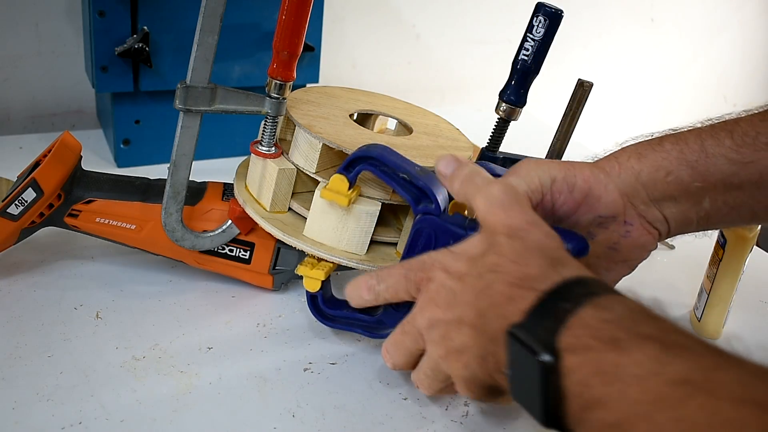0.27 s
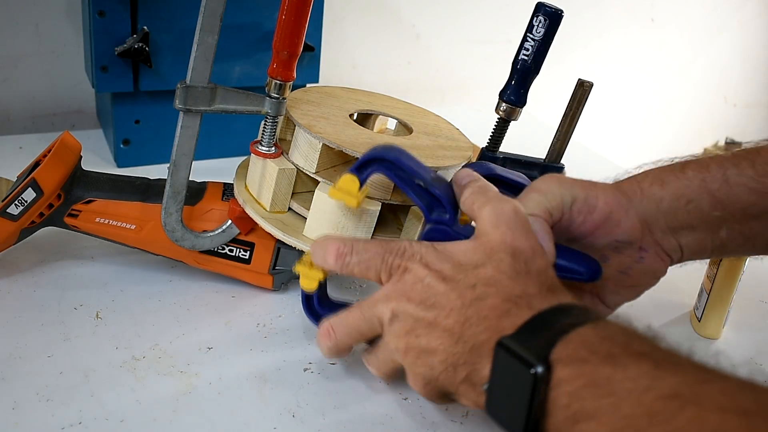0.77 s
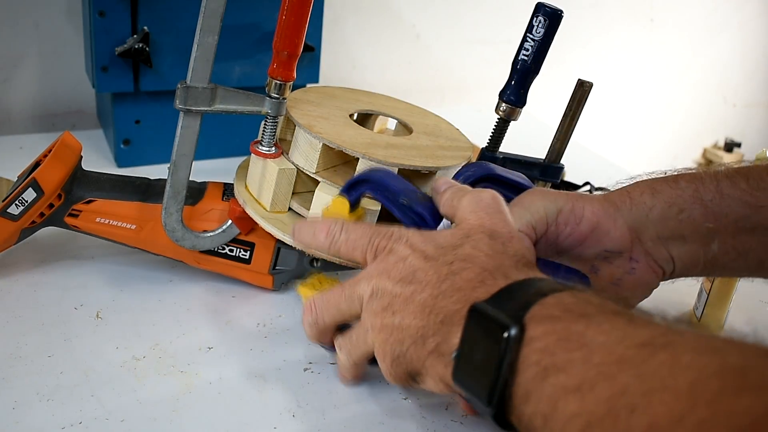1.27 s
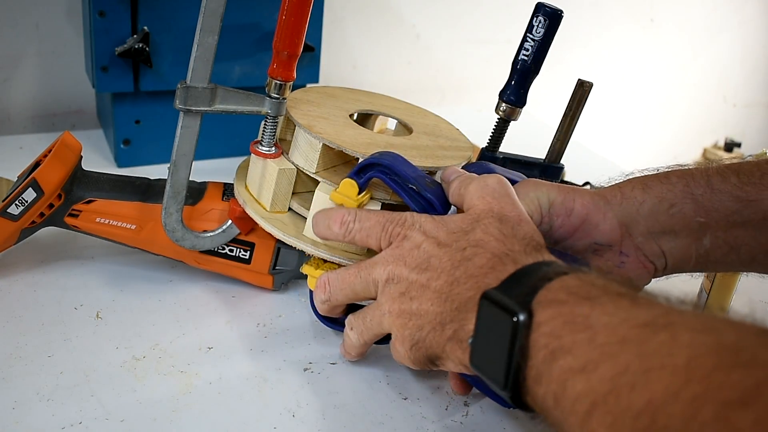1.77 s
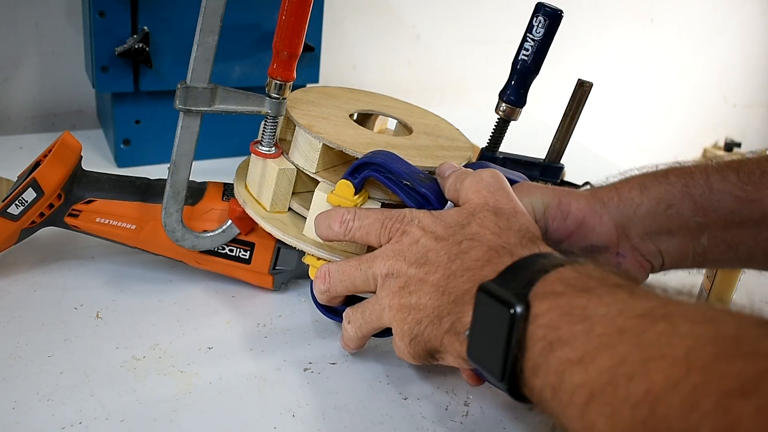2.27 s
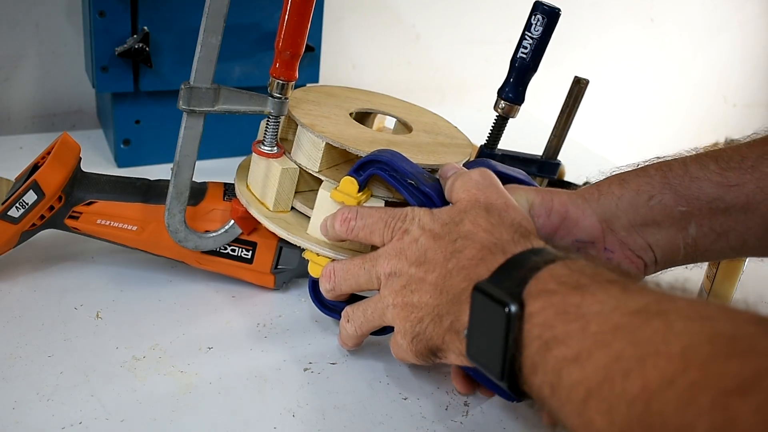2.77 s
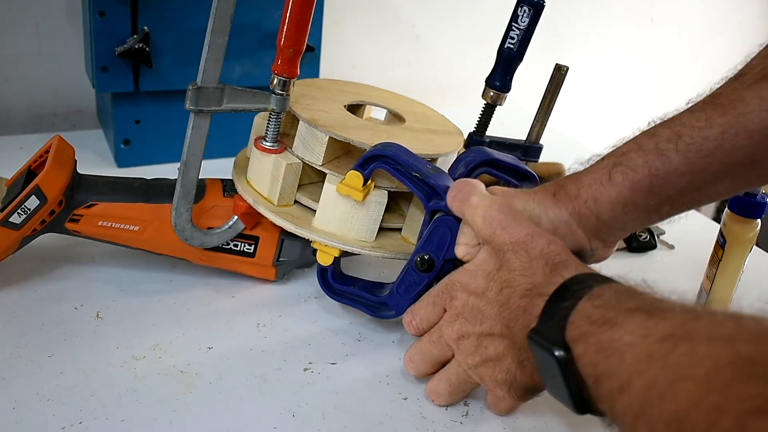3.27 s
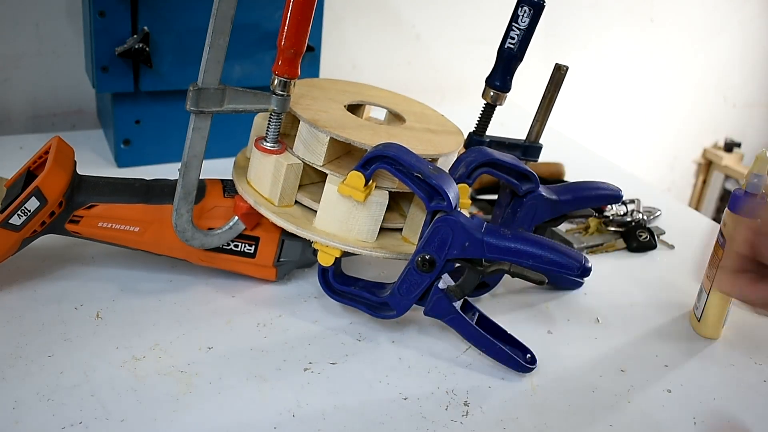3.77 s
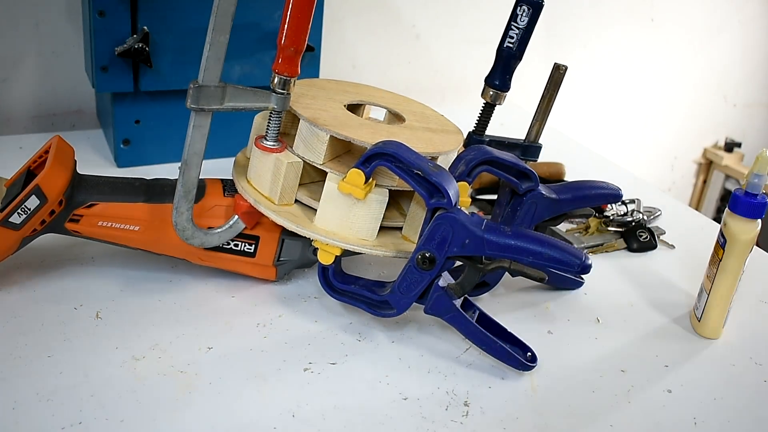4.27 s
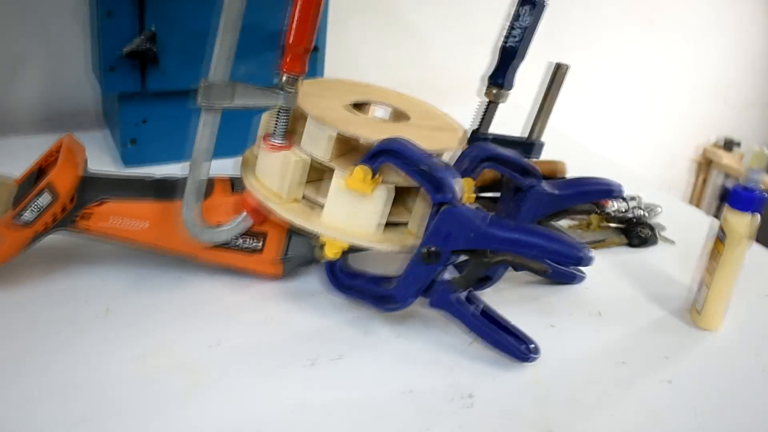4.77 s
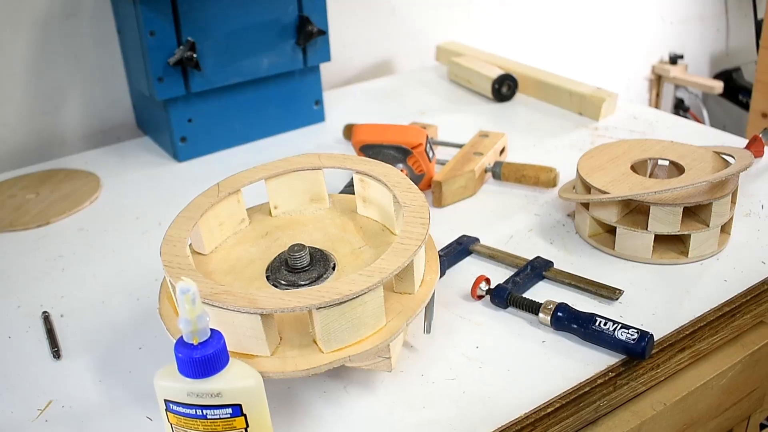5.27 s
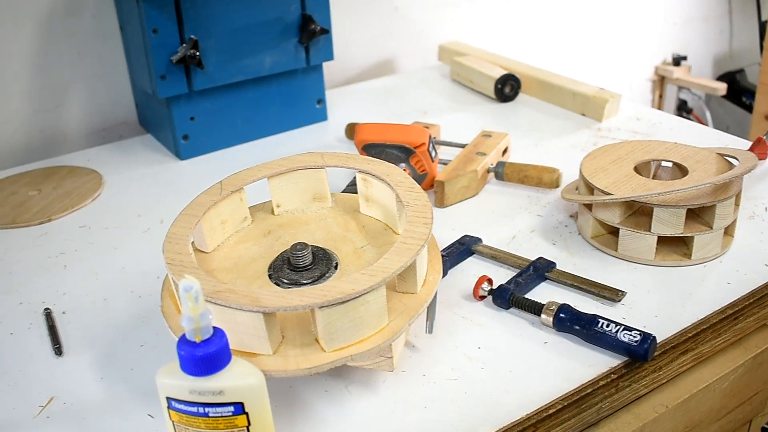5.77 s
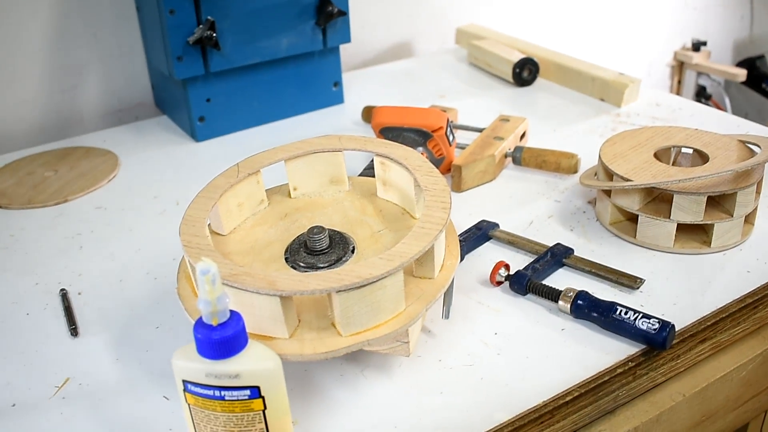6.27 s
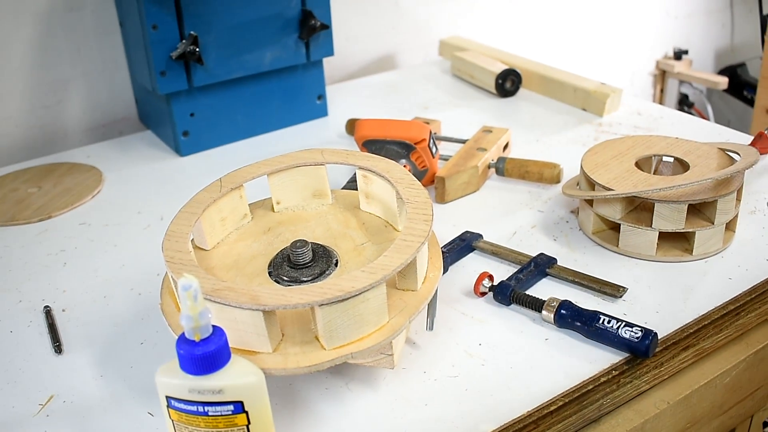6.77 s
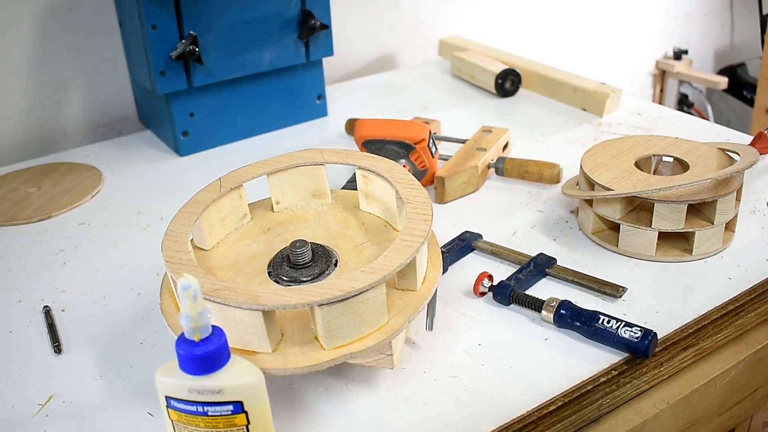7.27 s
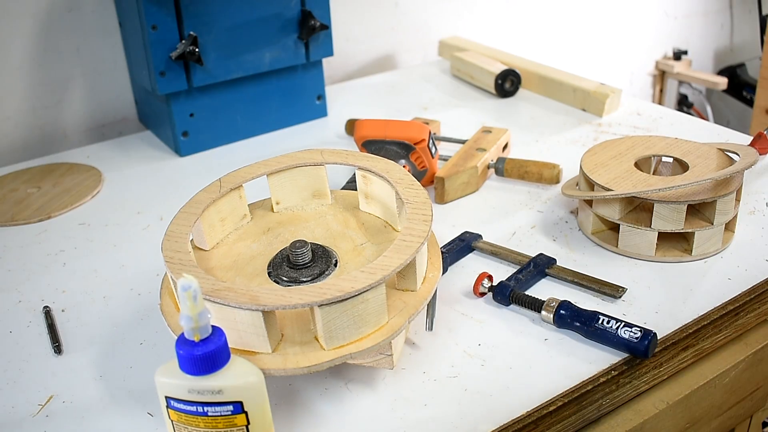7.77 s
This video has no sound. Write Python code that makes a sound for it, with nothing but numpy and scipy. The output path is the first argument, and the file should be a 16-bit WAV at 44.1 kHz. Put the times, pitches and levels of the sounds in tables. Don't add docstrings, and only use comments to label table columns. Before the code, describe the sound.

Faint hiss and low hum surround dull wooden knocks at arm's length. A fast cluster of plastic and steel clamp clicks stands out, with a short room tail. Quieter handling follows, then a dense, bright, dry rattle very near the microphone. A hard scene change leaves soft scrapes, small pings and wooden taps at the same bench, with a slight motor whine.

```python
import sys
import numpy as np
from scipy import signal
from scipy.io import wavfile

SR = 44100
rng = np.random.default_rng(int(sys.argv[2]) if len(sys.argv) > 2 else 0)


def makeup_ratio(level_db):
    decades = np.asarray(level_db, float) / 20
    return 10 ** decades


def master(y):
    cut = np.clip(np.atleast_2d(y).T, -1, 1)
    pcm = np.round(cut * 32767)
    wavfile.write(sys.argv[1], SR, pcm.astype(np.int16))


N = 353373
CUT_S = 5.15


def rms_one(x):
    return x / np.sqrt(np.mean(x ** 2) + 1e-20)


def peak_at(x, db):
    return makeup_ratio(db) * x / np.max(np.abs(x))


def band(x, low_hz, high_hz):
    return signal.sosfilt(signal.butter(2, [low_hz, high_hz], "band", fs=SR, output="sos"), x)


def resonance(x, hz, width_hz):
    r = np.exp(-np.pi * width_hz / SR)
    zeros = np.array([1, 0, -1]) * (1 - r * r) / 2
    poles = [1, -2 * r * np.cos(2 * np.pi * hz / SR), r * r]
    return signal.lfilter(zeros, poles, x)


def body(x, modes, spread_db=0.0):
    chance = rng.standard_normal(len(modes))
    out = np.zeros(len(x))
    for k, (hz, width_hz, db) in enumerate(modes):
        out += (-1) ** k * makeup_ratio(db + spread_db * chance[k]) * resonance(x, hz, width_hz)
    return out


def near(modes, hz, db_per_octave):
    return [(f, width, db - db_per_octave * abs(np.log2(f / hz))) for f, width, db in modes]


def drift(rate_hz):
    knots = rng.standard_normal(2000)
    return np.interp(np.arange(N) / SR * rate_hz, np.arange(len(knots)), knots)


def contact(t60_s, blow, count):
    decay = makeup_ratio(-60 * np.arange(count) / SR / t60_s)
    chatter = rng.standard_normal(count) * rng.exponential(1, count) * decay
    chatter[0] = blow
    return chatter


def friction(grains_per_s, flicker_db, count):
    slips = rng.random(count) < grains_per_s / SR
    grains = slips * rng.exponential(1, count) * rng.choice([-1, 1], count)
    flicker = makeup_ratio(flicker_db * drift(40)[:count])
    return (0.85 * rms_one(grains) + rng.standard_normal(count)) * flicker


def add(track, s, piece):
    at = round(s * SR)
    end = min(at + len(piece), round(CUT_S * SR) if s < CUT_S else N)
    track[at:end] += piece[:end - at]


# frequency in Hz, density in dB per Hz.
HISS_SPECTRUM = [(15, -30), (24, -8), (60, -5), (100, -3), (200, -7), (400, -10), (1000, -11), (2000, -16),
                 (4000, -20), (8000, -25), (13000, -30), (15700, -33)]
HISS_DB = -67.5


def air_hiss():
    edges_hz = 20 * 2 ** np.arange(0, 9.8, 1 / 3)
    white = rng.standard_normal((2, N))
    hz, db = np.transpose(HISS_SPECTRUM)
    log_centre = np.log(edges_hz[:-1] * edges_hz[1:]) / 2
    gains = makeup_ratio(np.interp(log_centre, np.log(hz), db))
    hiss = np.zeros(N)
    for k, gain in enumerate(gains):
        hiss += gain * band(white[k % 2], edges_hz[k], edges_hz[k + 1])
    return makeup_ratio(HISS_DB) * rms_one(hiss)


# start in s, end in s, frequency in Hz, width in Hz, level in dB.
HUMS = [(0, 8.1, 33, 3, -79), (0, 2.85, 181, 9, -73), (5.15, 7.6, 2390, 40, -83),
        (5.15, 7.6, 2730, 60, -85), (5.52, 5.75, 4300, 220, -79), (4.945, 4.958, 7250, 200, -66),
        (4.96, 5.08, 7250, 300, -78), (6.8, 6.92, 2450, 120, -73), (7.508, 7.53, 3350, 220, -61),
        (7.53, 7.56, 3350, 110, -68), (7.56, 7.582, 3350, 200, -62), (7.975, 8.1, 2480, 160, -59)]
# start in s, end in s, frequency in Hz, rms level in dB.
STEADY_WHINE = (5.15, 7.2, 522, -73)


def hums():
    t = np.arange(N) / SR
    out = np.zeros(N)
    for start, end, hz, width_hz, db in HUMS:
        whine = resonance(resonance(rng.standard_normal(N), hz, width_hz), hz, width_hz)
        gate = np.clip(np.minimum(t - start + .004, end - t) / .008, 0, 1)
        out += makeup_ratio(db) * rms_one(whine) * gate
    start, end, hz, db = STEADY_WHINE
    gate = (t > start) * np.clip((end - t) / .1, 0, 1)
    level = makeup_ratio(db + 3 + 1.5 * drift(3))
    return out + level * np.sin(2 * np.pi * hz * t) * gate


# time in s, activity in dB.
HAND_ACTIVITY = [(0.0, -69), (0.24, -73.5), (0.7, -67), (1.7, -78), (2.15, -69), (2.6, -71), (3.28, -67.5),
                 (3.6, -66.5), (3.88, -68), (4.4, -67.5), (4.7, -69.5), (4.839, -39.5), (4.97, -65.5),
                 (5.3, -73.5), (6.101, -68.5), (6.95, -71), (7.5, -62), (8.01, -61)]
DRAG_DB, DRAG_FOLLOWS, FIDGET_DB = -71, 1, -72


def handling():
    s, db = np.transpose(HAND_ACTIVITY)
    swing_db = np.interp(np.arange(N) / SR, s, db) + 70
    drag = band(friction(270, flicker_db=-4.0, count=N), 48.6, 520)
    fidget = friction(1500, flicker_db=.8, count=N)
    fidget = band(signal.lfilter([1], [1, -.7], fidget), 820, 11400)
    drag = makeup_ratio(DRAG_DB + DRAG_FOLLOWS * swing_db) * rms_one(drag)
    return drag + makeup_ratio(FIDGET_DB + swing_db) * rms_one(fidget)


# frequency in Hz, width in Hz, level in dB.
DRUM_MODES = [(250, 296, 3.5), (324, 170, 6), (558, 230, -6.5), (811, 82, -10), (900, 130, -9),
              (1350, 52, -0.5), (1580, 71, -3.5), (2190, 270, -12)]
BENCH_MODES = [(58.3, 29, -4.5), (114.4, 29, 7), (154, 31.4, 4.5), (217, 38, -0.5)]
# time in s, peak in dB, strongest ring in Hz, bench thump in relative dB.
FAR_KNOCKS = [(0.004, -50.5, 910, -1), (0.534, -45.5, 855, -0.5), (0.547, -41.5, 1350, -12),
              (0.866, -42, 840, -15), (1.269, -52.5, 966, -5), (1.431, -41, 815, -0.5),
              (2.051, -39, 980, -7.5), (2.081, -30, 1870, -17.5), (2.094, -33, 970, -18),
              (2.107, -37, 970, -19), (2.4, -52, 1500, -17), (2.776, -51, 256, 0.5),
              (2.829, -45.5, 250, -11), (3.201, -54.5, 428, 4), (3.533, -49, 1350, -25),
              (3.625, -52.5, 747, -15), (3.874, -46, 960, -29)]
FAR_KNOCK_T60_S = 0.17
# the same four, then rattle t60 in s.
NEAR_KNOCKS = [(4.2526, -29, 331, -24, .008), (4.2603, -37, 360, -13.5, .1), (4.269, -34, 400, -30, 0.05),
               (4.283, -34, 310, -15, .04), (4.291, -39, 900, -21, 0.13), (4.327, -46, 350, -12, .08),
               (4.676, -35.5, 485, -7, 0.12), (4.7137, -24.5, 680, -6.5, 0.028),
               (4.725, -24.5, 760, -12.5, .05), (4.744, -25, 300, -7, 0.079),
               (4.7919, -19, 1290, -12, 0.036), (4.812, -27, 750, -18, 0.05),
               (4.8138, -22.5, 304, -12, .04), (4.832, -28, 590, -7, 0.071), (4.871, -36, 300, -1.5, 0.033),
               (4.886, -34, 1200, -11, .05), (4.966, -48, 900, 3.5, 0.043), (5.0857, -35.5, 302, -2.5, .06),
               (5.102, -30, 350, -8, 0.066), (5.113, -31.5, 275, -10, 0.062), (5.13, -42.5, 250, 0, 0.066)]
SHUFFLE_KNOCKS = [(5.251, -52.5, 600, -3, .06), (5.267, -43.5, 900, -23, 0.049),
                  (5.286, -52.5, 900, -16, .03), (5.639, -51.5, 530, -13, 0.053),
                  (5.798, -51.5, 396, 2, 0.078), (5.996, -39.5, 686, -11, 0.035),
                  (6.122, -49, 385, -4, 0.063), (6.146, -46.5, 306, 2, 0.08), (6.192, -37, 486, -12, .015),
                  (6.2578, -39, 500, -4.5, 0.034), (7.173, -34.5, 636, -8, 0.11),
                  (7.199, -39, 410, -3, 0.081), (7.241, -41, 296, -27, 0.048),
                  (7.473, -40, 420, -26, 0.033), (7.516, -46.5, 450, -14, .04), (7.642, -38, 404, -27, 0.1),
                  (7.749, -42, 328, -15, .05), (7.766, -42, 324, -16, 0.035), (7.976, -45, 900, -26, 0.05)]
# first blow over the chatter, contact softness in Hz, damping of the modes, crack in relative dB.
CONTACTS = [
    (17.2, 1920, 1.1, -7.5),
    (24.6, 2300, 1.94, -21),
    (24.3, 2800, 2, -11),
]


def knocks():
    out = np.zeros(N)
    far = [(*row, FAR_KNOCK_T60_S) for row in FAR_KNOCKS]
    for rows, (blow, soft_hz, damping, crack_db) in zip((far, NEAR_KNOCKS, SHUFFLE_KNOCKS), CONTACTS):
        soft = signal.butter(4, soft_hz, fs=SR, output="sos")
        held_drum = [(f, damping * width, db) for f, width, db in DRUM_MODES]
        held_bench = [(f, damping * width, db) for f, width, db in BENCH_MODES]
        for s, db, hz, thump_db, t60_s in rows:
            force = signal.sosfilt(soft, contact(t60_s, blow, count=9000))
            push = np.convolve(force, np.hanning(int(SR / hz / 1.5) + 3))[:len(force)]
            push = push * np.std(force) / np.std(push)
            lead = makeup_ratio(7) * resonance(push, hz, hz / 3.0)
            drum = body(force, near(held_drum, hz, db_per_octave=6.5), spread_db=2.5) + lead
            bench = body(force, held_bench, spread_db=2.0)
            crack = band(force, 905, 2700)
            add(out, s, peak_at(drum, db))
            add(out, s, peak_at(bench, db + thump_db))
            add(out, s, peak_at(crack, db + crack_db))
    return out


RUB_EDGE_DB, RUB_ROUNDNESS = 12.5, 1.93


def rubs(rows, colour, grains_per_s, flicker_db):
    out = np.zeros(N)
    for s, rise_s, fall_s, db, *hz in rows:
        t = np.arange(-rise_s, fall_s, 1 / SR)
        away = np.where(t < 0, -t / rise_s, t / fall_s)
        edges = np.clip((1 - away) / .2, 0, 1)
        swell = edges * makeup_ratio(db - RUB_EDGE_DB * away ** RUB_ROUNDNESS)
        slip = colour(friction(grains_per_s, flicker_db, count=len(t)), *hz)
        add(out, s - rise_s, swell * rms_one(slip))
    return out


# strongest at in s, rise in s, fall in s, level in dB, leading ring in Hz.
WOOD_RUBS = [(0.18, 0.039, 0.044, -71, 1380), (0.69, .04, 0.037, -66, 1380), (0.73, 0.1, 0.11, -57.5, 970),
             (1.13, 0.027, 0.059, -62.5, 930), (1.344, 0.047, 0.047, -64.5, 1350),
             (2.1, .03, .11, -55, 1000), (2.87, 0.1, 0.067, -67.5, 990), (3.3, 0.064, 0.087, -70, 1300),
             (3.536, 0.0093, 0.044, -57, 1310), (3.89, 0.15, 0.072, -64, 955),
             (4.02, 0.098, 0.033, -62.5, 980), (4.27, 0.019, 0.098, -55.5, 1260),
             (4.682, 0.0073, 0.072, -46.5, 1000), (4.73, 0.031, 0.065, -38.5, 750),
             (4.84, 0.044, .08, -45, 775), (5.1, 0.021, 0.056, -52, 1180), (5.8, 0.066, 0.041, -67, 860),
             (6.126, 0.0092, 0.057, -55, 1410), (6.63, 0.12, 0.12, -62, 1228),
             (7.18, 0.0086, 0.12, -57, 815), (7.4, 0.033, 0.06, -59.5, 1880),
             (7.525, 0.032, .07, -60.5, 1550), (7.68, 0.049, 0.15, -55, 940),
             (7.87, 0.089, 0.05, -61.5, 2020), (7.985, 0.012, 0.023, -60, 900)]


def wood_rubs():
    def wood(x, hz):
        return 1.4 * band(x, 760, 1750) + 3.5 * resonance(x, hz, 104) + 1.7 * body(x, DRUM_MODES[3:])
    return rubs(WOOD_RUBS, wood, 2500, flicker_db=1.2)


# strongest at in s, rise in s, fall in s, level in dB, leading ring in Hz.
SKIN_RUBS = [(0.17, 0.042, .04, -73, 5000), (0.7, 0.034, 0.069, -65.5, 3100),
             (1.135, 0.034, 0.039, -60.5, 4450), (1.344, 0.051, 0.031, -68, 4300),
             (2.105, 0.035, 0.12, -52.5, 3800), (2.514, 0.01, 0.055, -67.5, 4900),
             (2.85, 0.083, 0.081, -68.5, 2300), (3.306, 0.031, 0.034, -65, 2560),
             (3.536, 0.011, 0.022, -64, 2820), (3.89, 0.18, 0.081, -66.5, 3080),
             (4.02, 0.063, 0.014, -64, 3140), (4.28, 0.028, 0.11, -63, 2100),
             (4.49, 0.11, 0.07, -64.5, 2930), (4.725, 0.028, 0.053, -44.5, 2300),
             (4.84, 0.032, 0.063, -43, 3080), (5.12, 0.044, 0.031, -51, 2900),
             (5.83, 0.078, 0.034, -64.5, 4350), (6.15, 0.02, .02, -67, 3800),
             (6.627, 0.02, 0.023, -51, 4850), (6.64, 0.16, 0.17, -59, 2370),
             (7.17, 0.059, 0.065, -59.5, 2920), (7.424, 0.054, 0.09, -58, 2370),
             (7.53, 0.032, 0.028, -60, 3280), (7.67, 0.032, 0.058, -55, 2040), (7.9, 0.15, 0.07, -56, 5120),
             (7.985, 0.0091, 0.026, -60, 5000)]


def skin_rubs():
    def skin(x, hz):
        return band(x, 1600, 5300) + 1.3 * resonance(x, hz, 452)
    return rubs(SKIN_RUBS, skin, 2500, flicker_db=1.2)


# strongest at in s, rise in s, fall in s, level in dB.
CLOTH_SWISHES = [(0.17, 0.029, 0.025, -69), (0.69, 0.045, 0.13, -66.5), (1.135, 0.038, 0.086, -64.5),
                 (1.344, 0.06, .03, -73), (2.11, 0.025, 0.13, -69), (2.514, .012, 0.045, -70),
                 (2.85, 0.11, .07, -75), (3.306, 0.026, 0.034, -70), (3.536, 0.016, 0.047, -67.5),
                 (3.88, 0.12, 0.087, -69.5), (4.02, 0.044, 0.043, -65.5), (4.286, 0.013, 0.063, -63),
                 (4.49, .08, 0.067, -66.5), (4.69, 0.017, 0.064, -52.5), (4.83, .05, 0.095, -70),
                 (5.115, 0.038, 0.035, -78), (6.153, .03, .02, -76), (6.66, .14, 0.14, -66.5),
                 (7.18, 0.044, 0.12, -70), (7.424, 0.066, 0.042, -64), (7.68, .04, 0.073, -63),
                 (7.88, 0.097, 0.11, -60.5), (8.005, 0.017, .02, -66)]


def cloth_swishes():
    def cloth(x):
        return band(x, 5500, 12000) + 0.52 * resonance(x, 8000, 2500)
    return rubs(CLOTH_SWISHES, cloth, 4000, flicker_db=1.2)


# time in s, peak in dB,
# frequency in Hz, ring t60 in s.
PINGS = [(.535, -53, 2400, .004), (0.547, -54, 3400, .004), (.556, -50.5, 1444, 0.11),
         (.776, -58, 3180, .02), (.776, -52, 1390, 0.035), (2.071, -33, 8380, .009),
         (2.0708, -29, 3970, .009), (2.082, -37, 8000, .008), (2.082, -28, 3800, .008),
         (2.106, -28.5, 2980, 0.0088), (4.262, -47, 1940, 0.046), (4.29, -54, 4000, 0.017),
         (4.717, -45, 14000, .004), (4.752, -50, 14300, .004), (4.766, -37, 8960, .004),
         (4.82, -27.5, 11550, 0.0043), (4.855, -28.5, 3050, .018), (4.8655, -37, 11000, 0.0046),
         (4.8936, -27.5, 3120, 0.015), (4.896, -55, 14500, .004), (4.935, -57, 14400, .004),
         (3.534, -52, 1350, .05), (5.996, -44.5, 700, .04), (4.977, -57, 4800, .01),
         (5.089, -59, 10000, 0.0043), (5.101, -60, 11000, .005), (5.107, -56, 9100, .005),
         (5.113, -49, 14300, .01), (5.122, -42, 4500, .03), (5.136, -45, 3140, 0.033),
         (6.119, -56, 1440, 0.034), (6.135, -55, 1470, .04), (6.135, -55, 3850, .02),
         (6.147, -57, 3950, .015), (6.192, -51, 2200, .01), (6.215, -52, 1540, .04),
         (6.259, -50, 3950, 0.013), (6.535, -57, 3700, .04), (6.575, -53, 3250, 0.037),
         (6.657, -55, 3010, .04), (7.265, -58, 4100, .03), (7.52, -59, 4720, .05), (7.979, -54, 5080, .05)]


def pings():
    out = np.zeros(N)
    for s, db, hz, t60_s in PINGS:
        width_hz = np.log(1000) / np.pi / t60_s
        ring = resonance(contact(0.005, blow=6.6, count=6000), hz, width_hz)
        add(out, s, peak_at(resonance(ring, hz, hz / 3), db))
    return out


# strongest at in s, rise in s, fall in s, level in dB.
BENCH_DRAGS = [(0.8, 0.12, 0.35, -68), (2.82, 0.07, 0.14, -64.5), (3.26, 0.16, 0.08, -66.5),
               (3.9, 0.16, 0.27, -64), (5.115, 0.043, 0.039, -47.5), (5.93, 0.48, 0.86, -63),
               (6.6, 0.22, 0.25, -59), (7.2, 0.094, 0.15, -57.5), (7.66, 0.11, 0.24, -62.5)]


def bench_drags():
    def bench(x):
        return band(x, 59, 600) + 0.84 * resonance(x, 344, 87)
    return rubs(BENCH_DRAGS, bench, 300, flicker_db=1.5)


# frequency in Hz, width in Hz, level in dB.
CLAMP_MODES = [(2416, 2800, -1.5), (3020, 590, -1.5), (3600, 3100, -12), (4250, 1100, 2), (5000, 400, -1)]
CLAMP_TREBLE_MODES = [(7000, 1170, 0.5), (8630, 920, -1), (11000, 1200, -7.5), (14300, 2400, -24.5)]
# time in s, peak in dB, strongest ring in Hz, treble in relative dB.
SNAPS = [(0.7755, -50.5, 4450, -0.5), (2.0705, -23.5, 3020, -10), (2.0805, -24, 2900, -5),
         (2.0936, -25.5, 2900, -11), (2.1057, -29, 4430, -7), (2.412, -53, 2160, -25),
         (2.8714, -43, 2980, -12), (3.534, -52, 2050, -2), (3.6237, -56, 3620, -8),
         (3.8774, -48, 3200, -16), (4.2834, -43.5, 1820, -18), (4.291, -46, 2730, -4),
         (4.4934, -50, 3060, 5), (5.6409, -49.5, 1700, -25), (5.9963, -46, 3600, -31),
         (6.1475, -46.5, 2190, -13), (6.193, -37.5, 3600, -26), (6.2582, -42, 3070, -14),
         (7.4729, -50, 5200, -10), (7.9793, -48, 2440, -16), (7.9994, -55, 2440, -8)]
CLATTER = [(4.7115, -25, 1920, -16), (4.7225, -19.5, 4250, -18), (4.7445, -31, 3660, -24),
           (4.748, -24.5, 3160, -18), (4.7578, -9.5, 3090, -18), (4.7605, -14.5, 3100, -6.5),
           (4.7665, -24.5, 5120, -13), (4.7722, -16, 3080, -31), (4.7805, -26.5, 4280, -18),
           (4.7908, -20.5, 4200, -27.5), (4.8145, -20, 2400, -15), (4.8198, -10, 4450, -5.5),
           (4.8305, -13, 2800, -10.5), (4.8335, -12, 2900, -18.5), (4.8444, -34, 2550, -22),
           (4.8552, -44, 3000, -30), (4.8658, -25.5, 3160, -6.5), (4.8745, -22, 2870, -15),
           (4.8926, -26, 3080, -32), (4.9355, -49, 3290, -5), (5.1135, -49.5, 5000, -5),
           (5.119, -29.5, 3400, -14),
           (4.7145, -33, 4270, -14), (4.7625, -25, 4360, -20), (4.776, -32, 3200, -25),
           (4.792, -22, 3770, -22), (4.8178, -22, 4500, -7), (4.881, -34, 2900, -22),
           (4.908, -47, 3200, -20), (5.083, -44.5, 2200, -15), (5.127, -47, 4500, -12)]
SNAP_T60_S, CLATTER_T60_S = 0.016, .009


def snaps():
    out = np.zeros(N)
    for rows, t60_s in ((SNAPS, SNAP_T60_S), (CLATTER, CLATTER_T60_S)):
        for s, db, hz, treble_db in rows:
            force = contact(t60_s, blow=5.8, count=4000)
            frame = body(force, near(CLAMP_MODES, hz, db_per_octave=6.0), spread_db=1.5)
            frame = frame + makeup_ratio(7) * resonance(force, hz, 420)
            frame = band(frame, 1800, 5480)
            treble = band(body(force, CLAMP_TREBLE_MODES, spread_db=2.5), 5500, 15500)
            add(out, s, peak_at(frame, db) + peak_at(treble, db + treble_db))
    return out


SHOP_T60_S, SHOP_DULL_HZ = 0.53, 5000


def workshop(x):
    t = np.arange(SR) / SR
    edges_hz = 40 * 2. ** np.arange(0, 9.1)
    white = rng.standard_normal(SR)
    tail = np.zeros(SR)
    for low, high in zip(edges_hz, edges_hz[1:]):
        faster = 1 + np.sqrt(low * high) / SHOP_DULL_HZ
        tail += band(white, low, high) * makeup_ratio(-60 * t * faster / SHOP_T60_S)
    return signal.fftconvolve(x, makeup_ratio(-21) * tail * np.clip(t / .012, 0, 1))[:N]


# start in s, room in dB relative to the direct sound.
DISTANCE = [
    (0, -14.5),
    (4.6, -28),
    (5.149, -20),
]


def scene():
    t = np.arange(N) / SR
    hits = snaps() + pings() + knocks()
    since_s, room_db = np.transpose(DISTANCE)
    sent = hits * makeup_ratio(room_db[np.searchsorted(since_s, t, side="right") - 1])
    before = t < CUT_S
    chop = np.clip((CUT_S - t) / 0.0025, 0, 1)
    clamping = (hits * before + workshop(sent * before)) * chop
    shuffling = hits * ~before + workshop(sent * ~before)
    rubbing = handling() + bench_drags() + wood_rubs() + skin_rubs() + cloth_swishes()
    return (clamping + shuffling + rubbing + air_hiss() + hums())[None]


def roll_off(x):
    return signal.sosfilt(signal.butter(12, 16180, fs=SR, output="sos"), x)


def record(dry):
    peaks_rounded = .5 * np.tanh(dry / .5)
    top_cut = signal.cheby2(14, 50, 16400, fs=SR, output="sos")
    mix = signal.sosfilt(top_cut, peaks_rounded)
    return roll_off(mix)


dry = scene()
out = record(dry)
master(out)
```